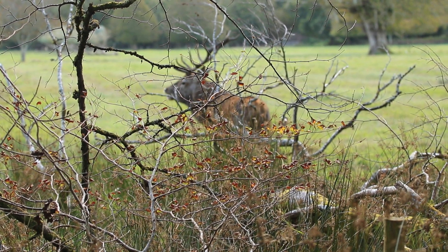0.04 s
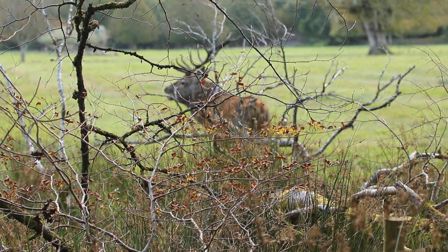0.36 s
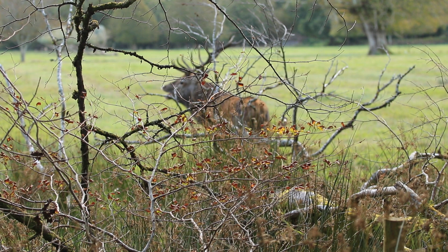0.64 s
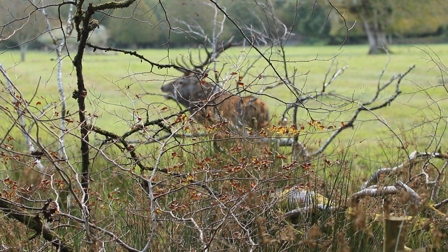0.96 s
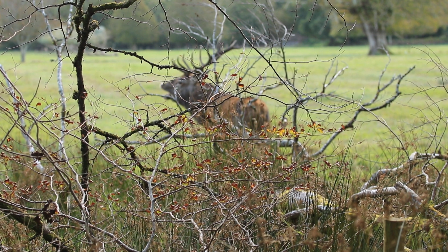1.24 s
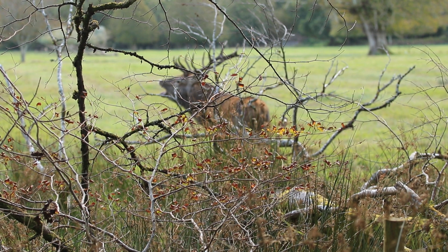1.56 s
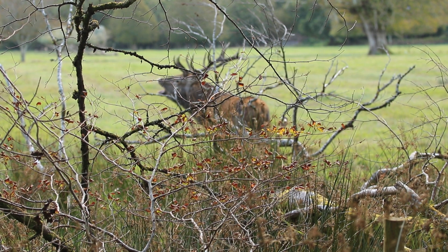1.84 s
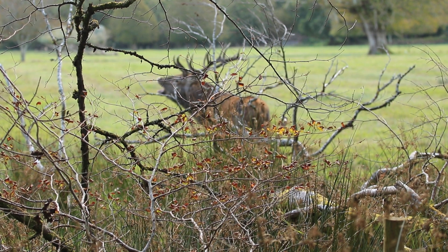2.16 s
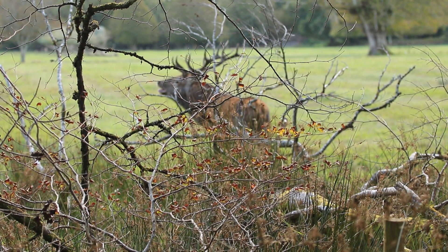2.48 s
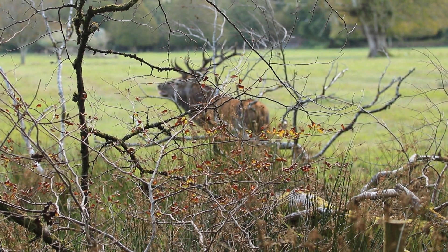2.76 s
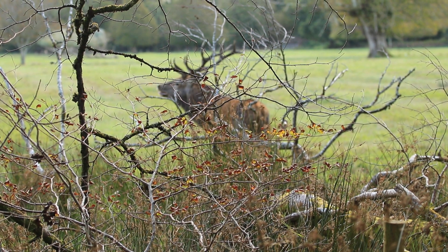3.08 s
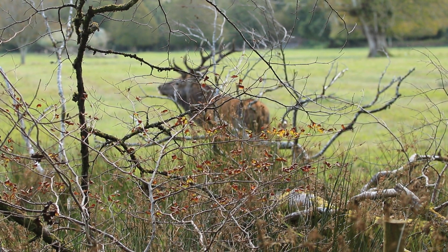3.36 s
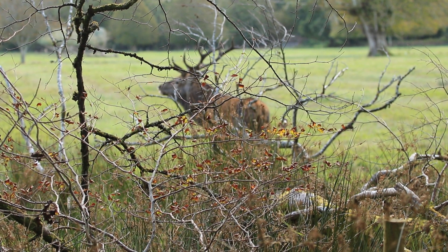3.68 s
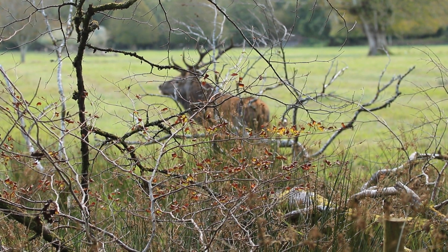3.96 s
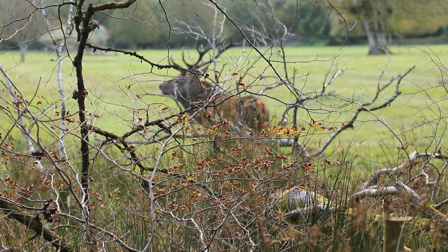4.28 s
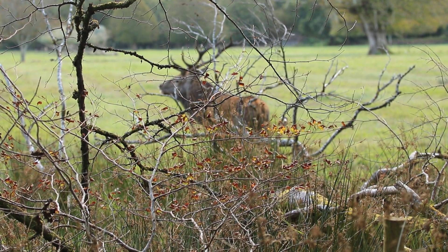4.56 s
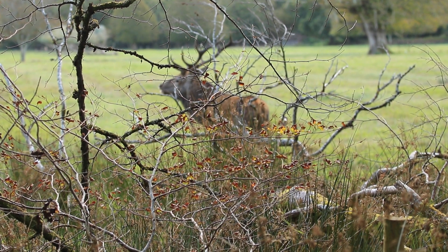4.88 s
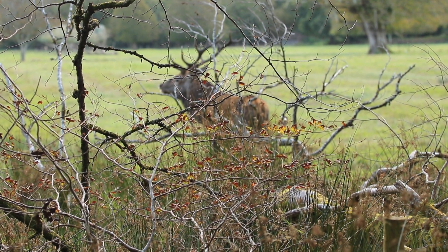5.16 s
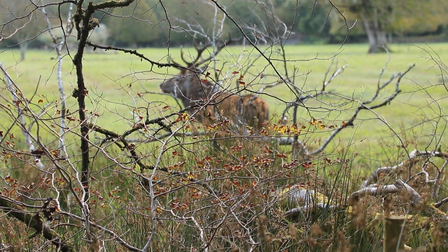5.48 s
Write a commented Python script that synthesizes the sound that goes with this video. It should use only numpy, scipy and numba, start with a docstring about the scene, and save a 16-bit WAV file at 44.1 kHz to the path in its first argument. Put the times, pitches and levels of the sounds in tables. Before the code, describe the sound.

A red deer stag roars twice across a meadow, with nearby twigs snapping, distant crows cawing and a steady outdoor hush.

```python
"""A red deer stag roars twice across a meadow: a buzzing roar that ends in a creak, a low grunt, then a
fuller roar. Pulses from his vocal folds ring his throat, whose resonances sink as he stretches it.
Close by, dry stems rustle and snap, and handling the microphone adds a brief, dull rumble.
Far off, crows caw and jackdaws yelp; the trees echo the birds and the stag.
Behind it all lies the steady hush of the open air, heard in mono."""
import sys
import numpy as np
from scipy import signal
from scipy.fft import rfft, irfft
from scipy.io import wavfile
from scipy.ndimage import uniform_filter1d
from numba import njit

SR = 44100
rng = np.random.default_rng(int(sys.argv[2]) if len(sys.argv) > 2 else 0)


def output_pcm(signal):
    """Save a mono or channel-first signal as 16-bit PCM at the path in sys.argv[1].

    Samples are clipped to [-1, 1] before scaling.
    """
    pcm = np.clip(np.atleast_2d(signal).T, -1, 1) * 32767
    wavfile.write(sys.argv[1], SR, np.round(pcm).astype(np.int16))


N = 248283
TIME = np.arange(N) / SR

# the stag's fold rate: time_s, pitch_hz
FIRST_ROAR_PITCH = [(0.0, 104.2), (0.038, 103.6), (0.178, 103.5), (0.498, 103.9), (0.59, 103.1),
                    (0.632, 100.7), (0.664, 94.7), (0.698, 82.34), (0.78, 71.1)]
# loudness of his two main bands: time_s, throat_db, mouth_db
FIRST_ROAR_LEVEL = [(0.0, -39, -19), (0.008, -35.5, -26), (0.226, -34.5, -26.5), (0.55, -31.5, -24.5),
                    (0.682, -25.5, -24), (0.718, -37.5, -39), (0.742, -32.5, -33), (0.79, -45.5, -52)]
# tract resonances (one chest, four throat, two mouth, two edge): short_hz, stretched_hz, width_hz, gain_db
FIRST_ROAR_TRACT = [(166, 174, 19, 18.5), (625, 556, 33, -2.5), (920, 780, 114, -6), (1254, 1344, 102, 0.5),
                    (1569, 1460, 37, 5), (1925, 1660, 85, 9.5), (2198, 2280, 83, 5), (2495, 2780, 59, 5.4),
                    (3675, 3500, 88, -13)]


def first_roar():
    """Across the meadow, already under way: a level buzz that sags into a creak."""
    return roar(FIRST_ROAR_PITCH, FIRST_ROAR_LEVEL, FIRST_ROAR_TRACT,
                stretching(midway_s=.6, pace_s=.065), start_s=-1, edge_db=-6, top_db=6,
                overtone_hz=6300, overtone_db=-25, rasp_db=-15, scatter_share=.2)


# fold rate: time_s, pitch_hz
SECOND_ROAR_PITCH = [(1.2, 99.9), (1.23, 98.6), (1.326, 102.4), (1.422, 109), (1.492, 111.3),
                     (1.734, 115.9), (1.864, 123), (1.948, 120), (2.126, 118.6), (2.236, 111.3),
                     (2.274, 106.8), (2.47, 67.1)]
# loudness: time_s, throat_db, mouth_db
SECOND_ROAR_LEVEL = [(1.18, -43, -45), (1.204, -35, -36.5), (1.31, -26.5, -35), (1.422, -28, -36),
                     (1.534, -29.5, -27.5), (1.606, -22.5, -33), (1.656, -27, -28.5), (1.82, -23.5, -26.5),
                     (1.904, -18.5, -30.5), (1.95, -26, -25.5), (2.066, -22, -31.5), (2.186, -23.5, -28),
                     (2.422, -29, -31), (2.48, -37, -41.5)]
# tract resonances, chest to edge: short_hz, stretched_hz, width_hz, gain_db
SECOND_ROAR_TRACT = [(243, 188, 14.3, 33.6), (572, 464, 20.4, 6.5), (950, 623.4, 28.4, 5.5),
                     (1415, 950.6, 27, 4.5), (1450, 1343, 188, -2), (2240, 1750, 53, 11.5),
                     (2240, 2110, 113, 12.5), (3060, 2710, 78, 3.5), (3980, 3670, 250, -16.5)]


def second_roar():
    """From the same spot, fuller and raspier: the pitch arches while the resonances sink."""
    return roar(SECOND_ROAR_PITCH, SECOND_ROAR_LEVEL, SECOND_ROAR_TRACT,
                stretching(midway_s=1.343, pace_s=.19), start_s=1.18, edge_db=-.5, top_db=5,
                overtone_hz=5700, overtone_db=-28, rasp_db=-10, scatter_share=.58)


def roar(pitch, level, tract, stretch, start_s, edge_db, top_db, overtone_hz, overtone_db,
         rasp_db, scatter_share, brass_db=-12, dulling_db=7):
    """Fold pulses ring the lengthening vocal tract; the brassy edge dulls as the throat stretches."""
    pitch_hz, = in_time(pitch)
    throat_db, mouth_db = in_time(level)
    pulses = folds(pitch_hz, roughness(pitch_hz, start_s), jitter=.075, shimmer_db=3, air=1.1)
    source = scattered(pulses, spread_s=.006, share=scatter_share)
    # turbulence roughens the two highest resonances
    raspy = source + from_db(rasp_db) * rng.standard_normal(N)
    rings = []
    for k, (short_hz, stretched_hz, width_hz, gain_db) in enumerate(tract):
        centre_hz = short_hz + (stretched_hz - short_hz) * stretch
        ring = resonance(source if k < 7 else raspy, centre_hz, width_hz)
        rings.append((-1) ** k * from_db(gain_db) * ring)
    chest = band(rings[0], 124, 210, order=3)
    throat = evened(band(sum(rings[1:5]), 464, 1433))
    mouth = evened(band(sum(rings[5:7]), 1680, 2260, order=3))
    # the sharp closures add a brassy edge between the top resonances
    brass = from_db(brass_db) * band(source, 2650, 3510, order=2)
    edge = evened(band(rings[7] + from_db(top_db) * rings[8] + brass, 2200, 4410, order=6))
    overtone = from_db(overtone_db) * evened(band(resonance(source, overtone_hz, 150), 4300, 6900))
    edge_gain = from_db((throat_db + mouth_db) / 2 + edge_db - dulling_db * stretch)
    body = from_db(throat_db) * throat + from_db(mouth_db) * (mouth + chest)
    return during(level) * (body + edge_gain * (edge + overtone))


def folds(pitch_hz, rough, jitter, shimmer_db, air):
    """One sharp pulse per closure, uneven when rough, with a puff of turbulence after each."""
    cycles = .5 + np.cumsum(pitch_hz * (1 + jitter * rough * drift(70.9))) / SR
    at = np.flatnonzero(np.diff(np.floor(cycles)))
    # each closure falls between two samples and is shared by them
    late = (np.ceil(cycles[at]) - cycles[at]) / (cycles[at + 1] - cycles[at])
    size = from_db(shimmer_db * rough[at] * rng.standard_normal(len(at))) * np.sqrt(SR / pitch_hz[at])
    pulses = np.zeros(N)
    pulses[at], pulses[at + 1] = size * (1 - late), size * late
    puffs = rms_one(np.exp(-3 * (cycles % 1)) * rng.standard_normal(N))
    return pulses + air * rough * puffs


def roughness(pitch_hz, start_s, clean=.045, settle_s=.05, creak_below_hz=103):
    """The folds catch roughly, run clean when taut, and creak when they slacken."""
    catching = .8 * np.exp(-np.maximum(TIME - start_s, 0) / settle_s)
    creak = .015 * np.maximum(creak_below_hz - pitch_hz, 0)
    return clean + catching + creak


def stretching(midway_s, pace_s):
    """The larynx is drawn down in one smooth move: 0 = short tract, 1 = fully stretched."""
    return 1 / (1 + np.exp((midway_s - TIME) / pace_s))


def scattered(x, spread_s, share):
    """Longer paths to the microphone shift as his head moves, smearing pulses into a treble shimmer."""
    age, paths = TIME[:900], 0
    for _ in range(3):
        path = rng.standard_normal(len(age)) * np.exp(-age / spread_s)
        paths = paths + drift(3.3) * signal.fftconvolve(x, path / np.linalg.norm(path))[:N] / np.sqrt(3)
    direct = x - (1 - np.sqrt(1 - share)) * band(x, 1200, 9000, order=1)
    return direct + np.sqrt(share) * band(paths, 1200, 9000, order=2)


def grunt(pitch_hz=121, level_db=-32):
    """With his mouth shut only a wavering fundamental and its faint octave get out."""
    phase = 2 * np.pi * np.cumsum(pitch_hz * (1 + .038 * drift(30))) / SR
    level = envelope(start_s=1, attack_s=.0635, length_s=.13, t60_s=.6) * from_db(level_db + drift(35))
    return level * rms_one(np.sin(phase) + from_db(-17) * np.sin(2 * phase))


# dry stems brushing beside the microphone: start_s, length_s, level_db
STEM_BRUSHES = [(0.138, 0.02, -40.5), (0.765, 0.06, -42.5), (0.882, 0.13, -43), (1.001, 0.47, -39)]
# colour of their hiss: frequency_hz, density_db
STEM_SPECTRUM = [(1410, -59), (2400, -9.5), (3050, -3.5), (3510, -10.5), (4180, -13.5), (4530, -20),
                 (4750, -18), (5350, -19.5), (6370, -12), (8350, -18.5), (11300, -28.5), (14700, -27),
                 (16000, -36)]


def rustle():
    """Close by, stems slide over one another in a fine-grained hiss."""
    grain = from_db(2 * drift(480))
    sliding = sum(from_db(level_db) * envelope(start_s, attack_s=.018, length_s=length_s, t60_s=.06)
                  for start_s, length_s, level_db in STEM_BRUSHES)
    return sliding * rms_one(coloured_noise(STEM_SPECTRUM) * grain)


# twigs breaking near the microphone: start_s, strength_db
TWIG_SNAPS = [(1.3274, -26), (1.3339, -20.5), (1.394, -23), (1.4141, -20.5), (1.4304, -14.5), (1.4384, -19),
              (1.5972, -23), (1.7647, -27), (1.8108, -22.5), (1.8615, -17.5), (2.419, -32), (3.048, -24.5),
              (4.589, -28.5)]
# what a twig rings with: centre_hz, width_hz, gain_db
TWIG_MODES = [(4160, 550, -1), (6440, 1000, 6.5), (8360, 1440, 6), (13400, 5400, -6)]


def twigs(crack_s=.00039, splinter_db=-27, splinter_s=.01, gain_db=10.2, crackles_per_s=45):
    """Each snap is a crack and a spray of splintering fibres; small ones come as the rumble swells."""
    age = TIME[:1500]
    shape = np.exp(-age / crack_s) + from_db(splinter_db) * np.exp(-age / splinter_s)
    breaks = rng.random(N) < crackles_per_s * rumble_swell() ** 2 / SR
    crackle_db = -24 + 2.5 * rng.standard_normal(N)
    snaps = list(TWIG_SNAPS) + list(zip(TIME[breaks], crackle_db[breaks]))
    force = np.zeros(N)
    for (start_s, strength_db), fibres in zip(snaps, rng.standard_normal(size=(64, len(age)))):
        at, snap = round(start_s * SR), shape * fibres
        force[at:at + len(age)] += from_db(strength_db + gain_db) * snap / np.linalg.norm(snap)
    wood = sum((-1) ** k * from_db(db) * resonance(force, centre_hz, width_hz)
               for k, (centre_hz, width_hz, db) in enumerate(TWIG_MODES))
    return band(wood, 3000, 17000, order=2)


def handling(rumble_db=-35.5):
    """A dull handling rumble at the microphone."""
    return rumble_swell() * from_db(rumble_db) * rms_one(band(rng.standard_normal(N), 107, 350, order=2))


def rumble_swell():
    """The level of the handling rumble, 0-1: it swells steadily, then stops."""
    return envelope(start_s=1.1, attack_s=.365, length_s=.365, t60_s=.06)


# crows far across the meadow: start_s, length_s, start_pitch_hz, end_pitch_hz, resonance_hz, level_db
CROW_CAWS = [(0.812, 0.41, 344.4, 307.5, 1610, -40.5), (2.459, 0.34, 344, 303.7, 1610, -41),
             (3.148, 0.49, 347, 303, 1656, -42), (3.981, .24, 347.4, 329.3, 1910, -43.5),
             (4.24, 0.18, 360, 298, 1620, -43)]


def crows():
    """Hoarse, arching caws; distance leaves only the band around their main resonance."""
    pitch_hz, beak_hz, level = np.full(N, 330.), np.full(N, 1700.), np.zeros(N)
    for start_s, length_s, start_hz, end_hz, resonance_hz, level_db in CROW_CAWS:
        on = (TIME > start_s) & (TIME < start_s + length_s)
        progress = (TIME[on] - start_s) / length_s
        arch = np.sin(np.pi * progress)
        pitch_hz[on] = start_hz + (end_hz - start_hz) * progress ** 2 + 14 * arch
        beak_hz[on] = resonance_hz
        level[on] = from_db(level_db) * np.sqrt(arch)
    source = folds(pitch_hz, rough=np.ones(N), jitter=.035, shimmer_db=3, air=.9)
    return level * evened(band(resonance(source, beak_hz, 500), 1060, 2070, order=3))


# distant jackdaws: start_s, length_s, start_pitch_hz, end_pitch_hz, strength_db
JACKDAW_YELPS = [(3.67, .05, 2600, 2300, -46), (3.95, .06, 2050, 1500, -38), (4.32, .06, 1600, 1150, -40),
                 (4.335, .07, 2200, 1600, -37), (4.48, .04, 2400, 2050, -39), (4.52, .04, 1750, 1420, -40),
                 (4.57, .045, 2300, 1900, -44), (4.8, .055, 1350, 900, -44), (4.838, .065, 2150, 1450, -37),
                 (4.865, .04, 2300, 1930, -42), (5.0, .045, 1950, 1500, -42), (5.03, .04, 2000, 1630, -41),
                 (5.275, .05, 2600, 2330, -43)]


def jackdaws():
    """Short, hoarse downward yelps from far off."""
    yelps = np.zeros(N)
    waver, hoarse = 1 + .01 * drift(300), 1 + .3 * drift(350)
    for start_s, length_s, start_hz, end_hz, strength_db in JACKDAW_YELPS:
        on = (TIME > start_s) & (TIME < start_s + length_s)
        progress = (TIME[on] - start_s) / length_s
        pitch_hz = start_hz * (end_hz / start_hz) ** progress * waver[on]
        tone = np.sin(2 * np.pi * np.cumsum(pitch_hz) / SR)
        yelps[on] += from_db(strength_db) * np.sin(np.pi * progress) * tone
    return yelps * hoarse


# echoes reaching the microphone from the trees: delay_s, gain_db
TREE_ECHOES = [(.043, -18), (.097, -15), (0.172, -19)]


def meadow(x, scatter_db, t60_s=.5):
    """The direct sound, a few dull echoes from trunks and a faint scatter from the wood's edge."""
    scatter = band(rng.standard_normal(SR), 220, 2100, order=1) * from_db(-60 * TIME[:SR] / t60_s)
    response = from_db(scatter_db) * scatter / np.linalg.norm(scatter)
    for delay_s, gain_db in TREE_ECHOES:
        response[round(delay_s * SR)] += from_db(gain_db)
    return x + band(signal.fftconvolve(x, response)[:N], 120, 9000, order=1)


# the hush over the meadow: frequency_hz, density_db
HUSH_SPECTRUM = [(15, -55), (25, -30), (64, -7), (134, -6.5), (180, -4.5), (459, -3), (510, -6.5),
                 (555, -4.5), (1120, -9), (1270, -9), (1470, -9.5), (1900, -16), (2400, -14), (4000, -20),
                 (5200, -35.5), (8800, -120)]
# leaves all round: frequency_hz, density_db
LEAF_SPECTRUM = [(2590, -50), (4400, -52), (4900, -6.5), (5990, 1), (7120, 1.5), (8600, 3), (11100, -6),
                 (14800, -13), (16000, -19)]


def open_air(hush_db=-40.5, leaves_db=-56.5, rise_db_per_s=.4, trill_db=-58, trill_start_s=5.17):
    """A broad hush, slowly freshening leaf hiss and, near the end, a thin high trill."""
    hush = from_db(hush_db + .84 * drift(1.4)) * coloured_noise(HUSH_SPECTRUM)
    leaves = from_db(leaves_db + rise_db_per_s * TIME) * coloured_noise(LEAF_SPECTRUM)
    trill_level = from_db(trill_db) * np.clip((TIME - trill_start_s) / .053, 0, 1)
    return hush + leaves + trill_level * rms_one(band(rng.standard_normal(N), 7600, 8000, order=2))


def from_db(db):
    return 10 ** (np.asarray(db) / 20)


def rms_one(x):
    return x / np.sqrt(np.mean(x ** 2) + 1e-20)


def in_time(rows):
    """The columns of a curve table at every sample."""
    time_s, *columns = np.transpose(rows)
    return [np.interp(TIME, time_s, column) for column in columns]


def during(rows, fade_s=.019):
    """1 while a curve lasts, with short fades outside it."""
    return np.clip(1 + np.minimum(TIME - rows[0][0], rows[-1][0] - TIME) / fade_s, 0, 1)


def envelope(start_s, attack_s, length_s, t60_s):
    """Rises in a straight line, holds until its length is over, then dies away."""
    age = TIME - start_s
    return np.clip(age / attack_s, 0, 1) * from_db(-60 * np.clip((age - length_s) / t60_s, 0, 3))


def band(x, low_hz, high_hz, order=4):
    sections = signal.butter(order, [low_hz, high_hz], "band", fs=SR, output="sos")
    return signal.sosfilt(sections, x)


def drift(rate_hz):
    """A smooth random wander of rms 1 that changes about rate_hz times a second."""
    hz = np.arange(N // 2 + 1) * SR / N
    return rms_one(irfft(rfft(rng.standard_normal(N)) / (1 + (hz / rate_hz) ** 4), N))


def coloured_noise(spectrum):
    """Noise of rms 1 with the given spectrum, falling steeply beyond its ends."""
    hz = np.arange(1, N // 2 + 2) * SR / N
    points_hz, db = np.transpose(spectrum)
    ends = np.minimum(1, np.minimum(hz / points_hz[0], points_hz[-1] / hz)) ** 12
    colour = from_db(np.interp(np.log(hz), np.log(points_hz), db))
    return rms_one(irfft(rfft(rng.standard_normal(N)) * ends * colour, N))


def evened(x):
    """Level held at rms 1 over a few fold cycles."""
    power = uniform_filter1d(uniform_filter1d(x * x, size=1100), size=900)
    return x / np.sqrt(np.abs(power) + 1e-14)


def resonance(x, hz, width_hz):
    """A resonance of gain 1 whose centre may move."""
    floor = 1e-18 * (-1) ** (np.arange(N) % 3)   # keeps the decay from underflowing
    return two_pole(x + floor, 2 * np.pi * hz / SR * np.ones(N), np.exp(-np.pi * width_hz / SR))


@njit
def two_pole(x, angle, radius):
    y = np.zeros(len(x))
    for i in range(2, len(x)):
        feedback = 2 * radius * np.cos(angle[i]) * y[i - 1] - radius ** 2 * y[i - 2]
        y[i] = (1 - radius ** 2) / 2 * (x[i] - x[i - 2]) + feedback
    return y


def scene():
    """One microphone: stag and birds out in the meadow, stems close by, open air all round."""
    stag = meadow(first_roar() + second_roar() + grunt(), scatter_db=-18)
    birds = meadow(crows() + from_db(-1) * jackdaws(), scatter_db=-11)
    near = rustle() + handling() + twigs()
    return (stag + birds + near + open_air())[None]


def record(dry, cutoff_hz=15900):
    """The top of the microphone's signal is cut steeply."""
    return signal.sosfilt(signal.ellip(12, .1, 80, cutoff_hz, fs=SR, output="sos"), dry)


dry = scene()
out = record(dry)
output_pcm(out)
```